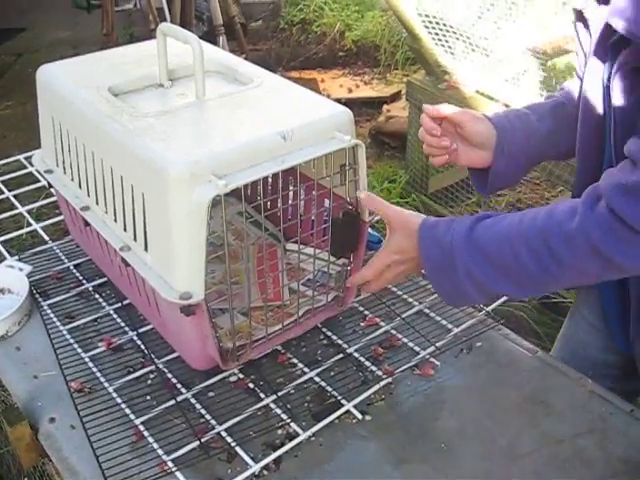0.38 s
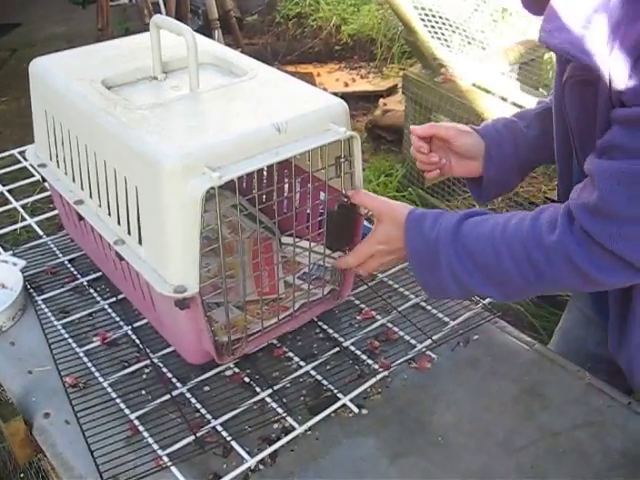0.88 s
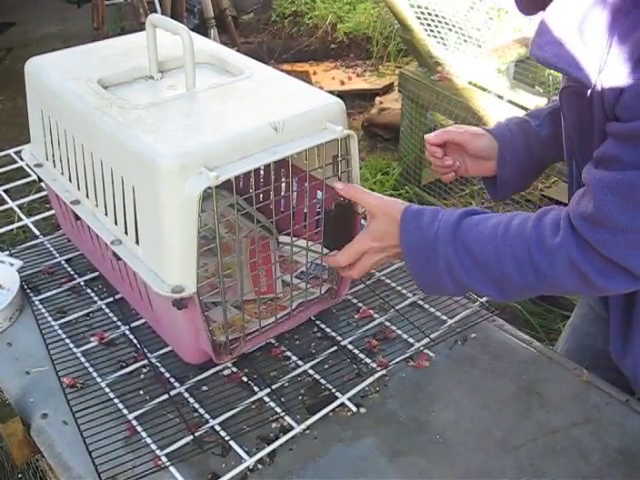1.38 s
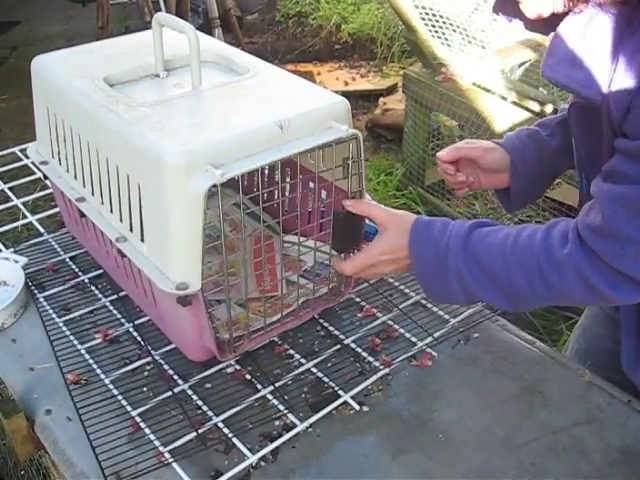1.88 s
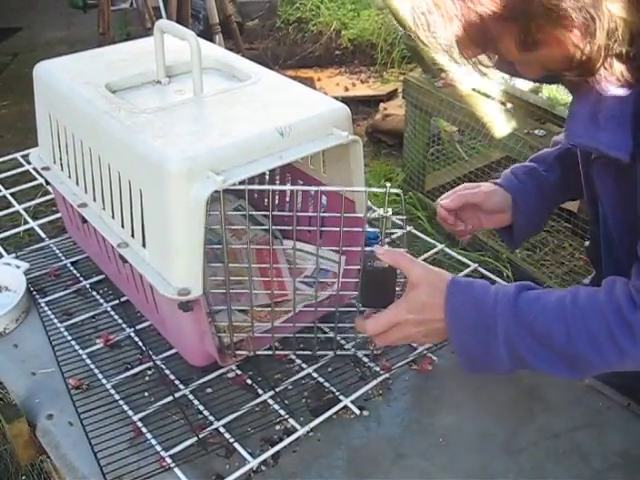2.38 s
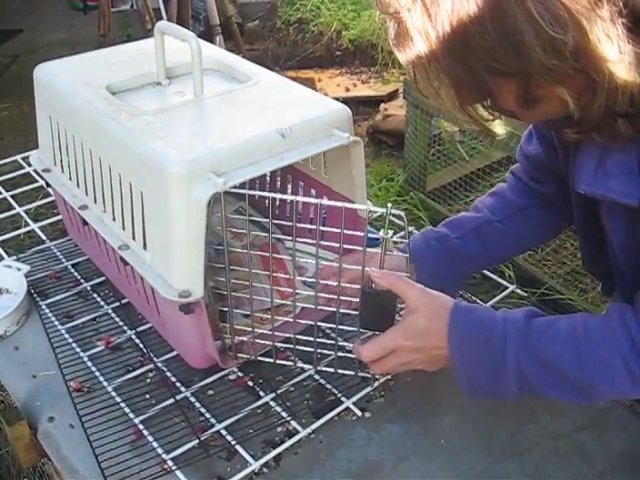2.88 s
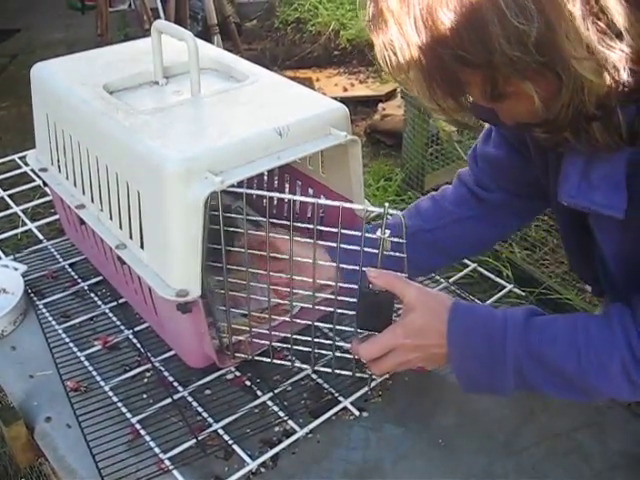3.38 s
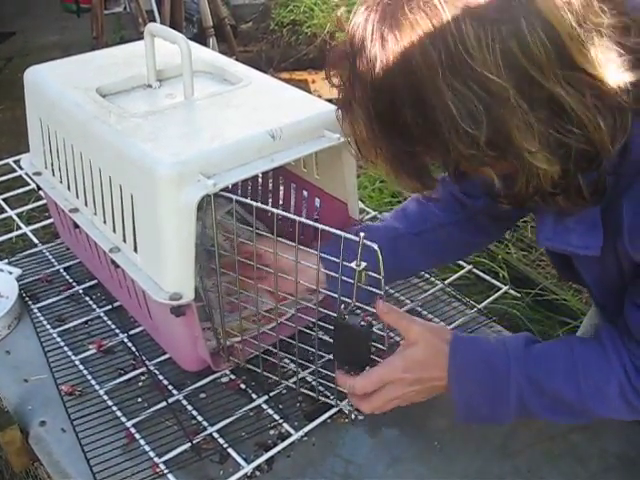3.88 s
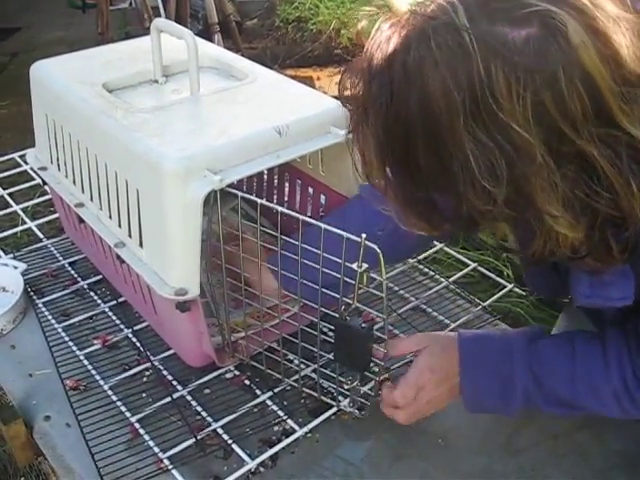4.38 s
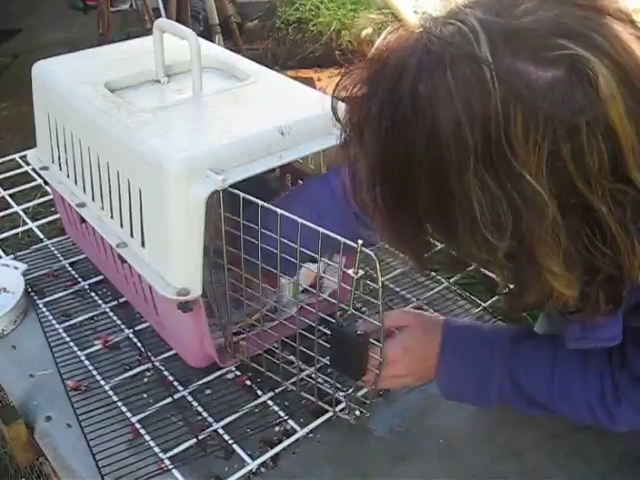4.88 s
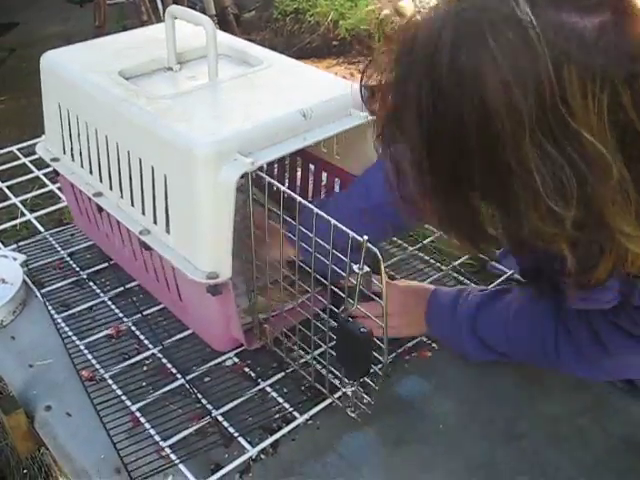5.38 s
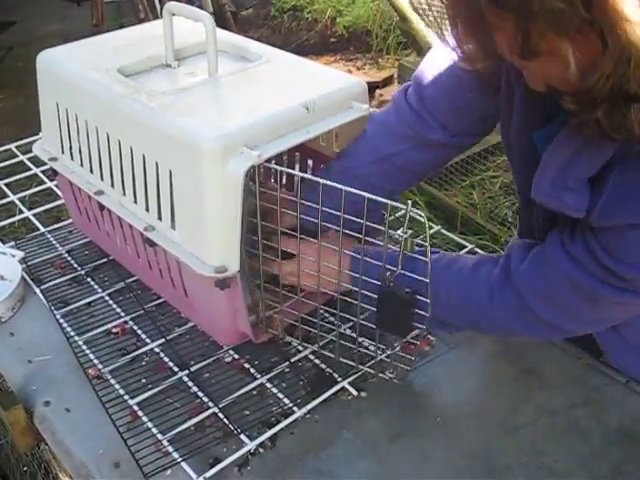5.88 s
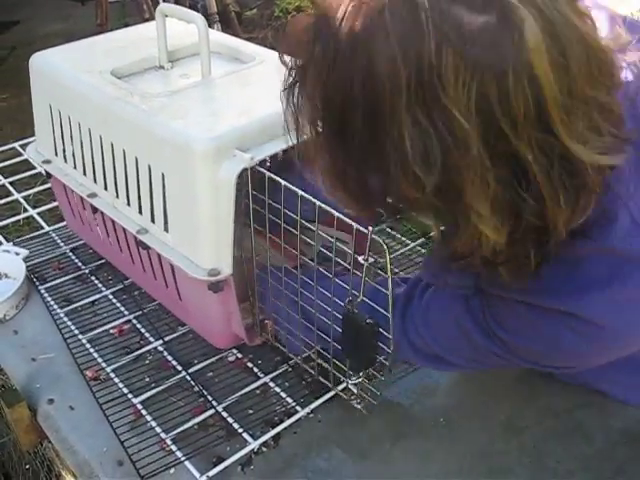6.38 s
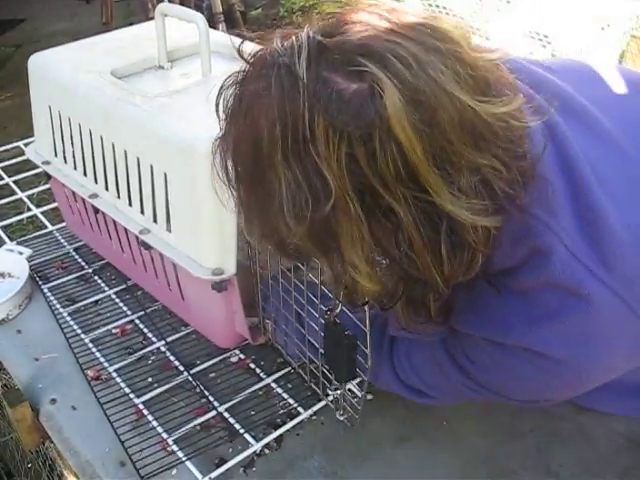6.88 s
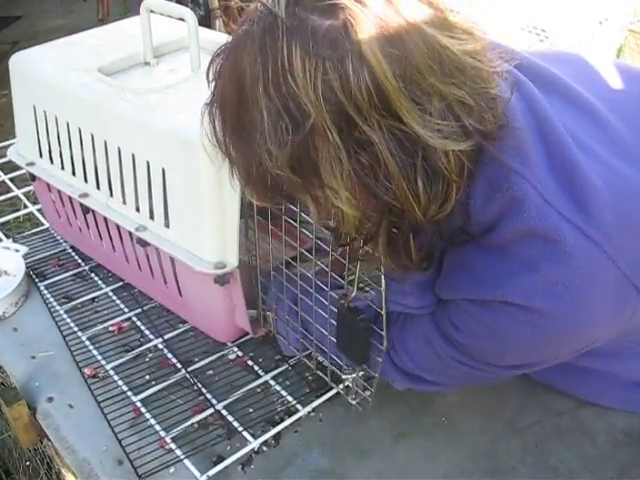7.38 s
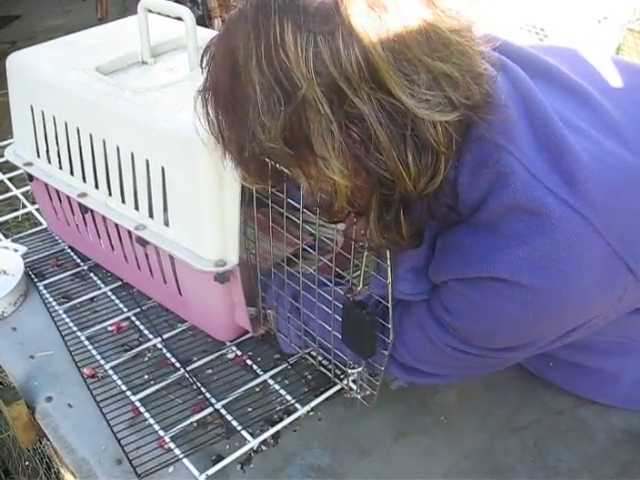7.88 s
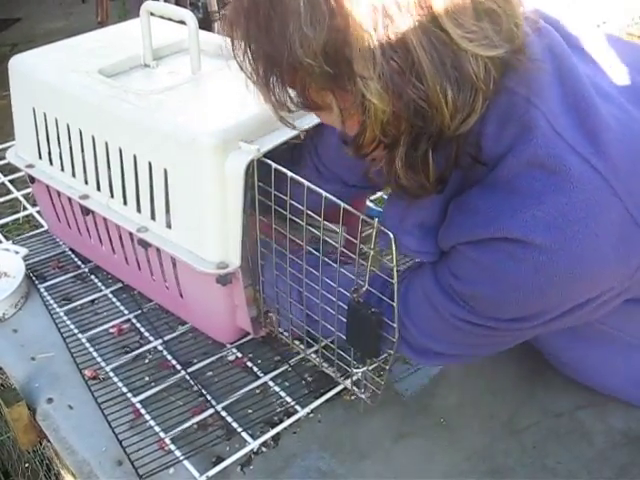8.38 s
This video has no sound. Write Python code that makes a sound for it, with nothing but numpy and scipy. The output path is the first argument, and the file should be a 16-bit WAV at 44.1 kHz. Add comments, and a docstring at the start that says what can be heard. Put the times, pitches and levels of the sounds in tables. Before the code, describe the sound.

Close, lo-fi outdoor handling noise: soft bumps on a hollow plastic box, a metallic latch clack, thin squeaks and a rattling wire grille. Paper bedding rustles almost without pause as hands rummage inside, building to a busy cluster of clatter and knocks, then calming to lighter rubbing, chirpy squeaks, low wind puffs and a tiny animal whine. Sparse bird chirps early, very short yard echo.

```python
"""Garden hiss, a faint squeak and bird notes come first, over a quiet bed of paper and plastic.
A hand then unlatches the wire door of a plastic pet carrier on a table and reaches into the paper bedding.
Friction noise, impulses and short bursts ring the door, the air in the box and the plastic shell.
Gliding sines chirp, trill and squeak, low puffs of wind push the microphone, a wavering voice whines.
A small camera samples it all at a low rate."""
import sys
import numpy as np
from scipy import signal
from scipy.fft import rfft, irfft, next_fast_len
from scipy.io import wavfile
from scipy.ndimage import map_coordinates

SR = 44100
rng = np.random.default_rng(int(sys.argv[2]) if len(sys.argv) > 2 else 0)


def store_pcm(level_fs):
    """Save levels as 16-bit WAV."""
    pcm = np.round(np.clip(level_fs, -1, 1) * 32767).astype(np.int16)
    wavfile.write(sys.argv[1], SR, np.atleast_2d(pcm).T)


def gain_from_db(level_db):
    """Turn a decibel level (scalar or array-like) into a linear amplitude factor."""
    decades = np.asarray(level_db, float) / 20
    return 10 ** decades


N = 374850  # length in samples, 8.5 s


def unit(x):
    """Scales a signal to rms 1."""
    return x / np.sqrt(np.mean(x ** 2) + 1e-20)


def along(points, hz):
    """Reads a curve of (f/Hz, value) points on a log frequency axis."""
    f, value = np.transpose(points)
    return np.interp(np.log(hz + 1), np.log(f + 1), value)


def curves(rows):
    """Draws one value per sample for each column after the time."""
    s, *columns = np.transpose(rows)
    return [np.interp(np.arange(N) / SR, s, column) for column in columns]


def wobble(rate):
    """A smooth random curve through rate knots a second."""
    knots = rng.standard_normal(int(N * rate / SR) + 4)
    return map_coordinates(knots, [np.arange(N) * rate / SR])


def filtered(x, response):
    """Multiplies the spectrum of x by a complex response of frequency."""
    size = next_fast_len(N + SR // 2)
    hz = np.fft.rfftfreq(size, 1 / SR)
    return irfft(rfft(x, size) * response(hz), size)[..., :N]


def two_pole(x, hz):
    """Dulls x with two equal low-pass poles, as soft contact does."""
    return filtered(x, lambda f: 1 / (1 + 1j * f / hz) ** 2)


def ring(x, modes):
    """Sends x through a body's resonances, signs alternating; white noise keeps its level."""
    def body(f):
        return sum((-1) ** k * gain_from_db(db) * 1j * f * width / (hz * hz - f * f + 1j * f * width)
                   for k, (hz, width, db) in enumerate(modes))
    return filtered(x, lambda f: body(f) / np.sqrt(np.mean(np.abs(body(f)) ** 2)))


def friction(slips_per_s, spread_db, smooth):
    """Random slips of uneven but bounded size over a smooth rub, at rms 1."""
    size = np.minimum(rng.exponential(size=N), 3)
    slips = (rng.random(N) < slips_per_s / SR) * gain_from_db(spread_db * size) * rng.standard_normal(N)
    return unit(unit(slips) + smooth * rng.standard_normal(N))


def ringing_grains(per_s, low_hz, high_hz, cycles):
    """Tiny knocks of single wires and creases, each at its own pitch, at rms 1."""
    when, pitch, size = rng.random((int(per_s * N / SR), 3)).T
    hz = low_hz * (high_hz / low_hz) ** pitch[:, None]
    t = np.arange(SR // 40) / SR
    envelope = np.exp(-t * hz / cycles) * (1 - np.exp(-t / 0.00022))
    grain = gain_from_db(14 * size)[:, None] * np.sin(2 * np.pi * hz * t) * envelope
    at = (when * N).astype(int)[:, None] + np.arange(len(t))
    return unit(np.bincount(at.ravel(), grain.ravel())[:N])


def bursts(times, dbs, t60s, attack):
    """A puff of noise for each contact, quick to rise, dying at its own speed."""
    out, t = np.zeros(N + SR), np.arange(SR // 10) / SR
    for s, db, t60 in zip(times, dbs, t60s):
        shape = gain_from_db(db - 60 * t / max(t60, .004)) * (1 - np.exp(-t / attack))
        out[round(s * SR):][:len(t)] += shape * rng.standard_normal(len(t))
    return out[:N]


def strokes(rows):
    """Gains of two layers under strokes that swell and fade evenly in dB, 20 dB per rise or fade."""
    t, main, second = np.arange(N) / SR, np.zeros(N), np.zeros(N)
    for s, db, over_db, rise, fade in rows:
        away = np.where(t < s, (s - t) / abs(rise), (t - s) / abs(fade))
        power = gain_from_db(2 * (db - 20 * away))
        main = main + power
        second = second + power * gain_from_db(2 * over_db)
    return np.sqrt(main), np.sqrt(second)


def uneven(stroke, steady, pressure):
    """Strokes waver a little with the hand's pressure; the rummaging comes in stronger clumps."""
    wavering = stroke * unit(gain_from_db(1.0 * pressure))
    clumped = steady * unit(gain_from_db(1.9 * pressure))
    return np.hypot(wavering, clumped)


# spectrum shape of garden air and camera hiss: f/Hz, relative level/dB per Hz
HISS_SHAPE = [(25, -12.5), (49, -22), (163, -9), (293, -13.5), (690, -9.5), (884, -17), (2130, -21),
              (4590, -24.5), (5500, -23), (7150, -57.5)]
# low rumble from breeze and table: t/s, rms level/dB
BREEZE_LEVEL = [(0.0, -80), (0.57, -38.5), (1.02, -65), (1.2, -38.5), (1.38, -62.5), (2.09, -48),
                (3.01, -62.5), (3.34, -55), (4.99, -55.5), (5.16, -27), (5.27, -36), (5.43, -48),
                (5.75, -52), (6.17, -41.5), (6.62, -65), (6.79, -46.5), (7.54, -58.5), (8.5, -61)]


def garden():
    """Far noise hiss that drifts a little, and low-passed lumps of breeze."""
    hiss = unit(filtered(rng.standard_normal(N), lambda hz: gain_from_db(along(HISS_SHAPE, hz))))
    rumble_shape = [(12, -15.0), (25, -14.5), (60, -7.0), (105, -0.5), (160, -6.0), (300, -47.0)]  # f/Hz, dB
    lumps = gain_from_db(2.5 * wobble(15)) * rng.standard_normal(N)
    breeze = unit(filtered(lumps, lambda hz: gain_from_db(along(rumble_shape, hz))))
    return gain_from_db(-46 + 1.3 * wobble(5.7)) * hiss + gain_from_db(curves(BREEZE_LEVEL)[0]) * breeze


# short squeaks and trills of wire, bird and animal:
# start t/s, end t/s, start f/Hz, end f/Hz, level/dB, scale of the pitch smear/%
SQUEAKS = [(0, .1, 1720, 1740, -55.5, 1.5), (1.353, 1.486, 2870, 2950, -49, 1.7),
           (1.496, 1.622, 2900, 3000, -55, 3.3), (1.637, 1.672, 4170, 4240, -31, 1.5),
           (1.643, 1.678, 3370, 3380, -35, 1.6), (1.749, 1.852, 2450, 2500, -43, 3),
           (1.81, 1.867, 3920, 3830, -46.5, 1.2), (1.757, 1.797, 4750, 4800, -50, 1.5),
           (1.792, 1.85, 1594, 1550, -48.5, 2.6), (1.958, 2.044, 2850, 2950, -50, 3.2),
           (2.07, 2.117, 3090, 2850, -29, 3.3), (2.065, 2.125, 2015, 2500, -31, 2.3),
           (2.08, 2.109, 4250, 4200, -31, 2.6), (6.888, 6.924, 2157, 2220, -27.5, 3.5),
           (2.38, 2.428, 2520, 2470, -40.5, 0.9), (7.393, 7.45, 4000, 4400, -32, 0.56),
           (7.438, 7.514, 4410, 4090, -36.5, 0.88), (7.45, 7.5, 2360, 2590, -42, .8),
           (7.885, 7.943, 2800, 2980, -45.5, 1.2)]


def squeaks():
    """A gliding squeak: a sine whose pitch is smeared and whose level flickers at random."""
    out, flicker, rasp = np.zeros(N), gain_from_db(3.9 * wobble(90)), gain_from_db(3 * wobble(400))
    waver = wobble(120) / 2 + 1.3 * wobble(700)
    for start, end, start_hz, end_hz, db, smear in SQUEAKS:
        at = np.arange(round(start * SR), round(end * SR))
        hz = np.linspace(start_hz, end_hz, len(at)) * (1 + smear / 100 * waver[at])
        tone = np.sin(2 * np.pi * np.cumsum(hz) / SR)
        envelope = unit(flicker[at] * rasp[at]) * signal.windows.tukey(len(at), .3)
        out[at] += np.sqrt(2) * gain_from_db(db) * envelope * tone
    return out


# resonances of the door's frame, also rung by the clicks: f/Hz, width f/Hz, level/dB
FRAME_MODES = [(1283, 670, -4.5), (1414, 130, 0), (1630, 160, -5), (2119, 203, 5), (2450, 400, -2.5)]
# resonances of the door's wires, also rung by the clicks: f/Hz, width f/Hz, level/dB
WIRE_MODES = [(2950, 940, -4.5), (3670, 170, 2.5), (3985, 470, -0.5), (4830, 880, -2), (5390, 510, -1)]
# the hand rummaging without a break, also in the shaking: t/s, paper level/dB, box level/dB
RUMMAGING = [(0, -68, -66), (1.3, -60.5, -53), (2.03, -60, -52), (2.25, -44.5, -39), (2.5, -53.5, -46.5),
             (2.78, -63, -45), (3.17, -57.5, -46.5), (3.4, -54.5, -42), (3.9, -57.5, -47),
             (4.3, -51.5, -42), (4.64, -58, -53), (4.83, -43.5, -34.5), (5.17, -52, -35.5),
             (5.45, -45, -42), (5.9, -43, -34.5), (6.6, -41.5, -36.5), (7.2, -45, -38.5),
             (7.8, -46.5, -44.5), (8.03, -56.5, -45.5), (8.5, -56.5, -45.5)]
# paper and sleeve along the door: peak t/s, frame level/dB, wires level/dB over the frame,
# rise t/s and fade t/s over 20 dB
DOOR_RUBS = [(1.182, -35.5, -31.5, 0.025, 0.13), (1.651, -46, 16, 0.014, 0.078),
             (1.701, -32.5, 0.5, 0.049, 0.047), (1.83, -44, -2.5, 0.3, .08),
             (2.06, -43.5, -2, 0.013, 0.092), (2.105, -27.5, -1.5, 0.034, 0.06),
             (2.544, -35.5, 2, 0.031, 0.11), (2.604, -36, 1.5, 0.076, 0.019), (3.213, -32, -8, .01, .1),
             (3.238, -25, -8, 0.033, 0.062), (3.277, -30.5, -6, 0.11, 0.011),
             (3.335, -37, -4.5, 0.04, 0.031), (3.424, -34.5, -1.5, 0.0095, 0.043),
             (3.555, -33.5, -3.5, 0.026, 0.037), (3.64, -39.5, -3, 0.072, 0.046),
             (3.776, -41, 0.5, 0.11, 0.066), (4.136, -34, 0.5, 0.018, 0.098),
             (4.232, -35.5, -3, 0.043, 0.03), (4.38, -41.5, -14, 0.017, 0.053),
             (4.739, -28.5, -5.5, 0.0063, 0.12), (4.862, -32, 1.2, 0.026, 0.055),
             (4.95, -37, -4.5, 0.076, 0.031), (5.06, -29, -4, 0.099, 0.085),
             (5.253, -37.5, 1.5, 0.038, 0.079), (5.89, -31.5, 1, 0.047, 0.054),
             (6.004, -28.5, 0, 0.021, 0.032), (6.125, -32, -0.5, 0.064, 0.055),
             (6.19, -24.5, -2, 0.04, 0.12), (6.36, -26, -7, 0.041, 0.053), (6.899, -33.5, 0, 0.025, 0.17),
             (7.02, -45.5, 5, 0.043, 0.058), (7.25, -37, -2.5, 0.052, 0.11),
             (7.917, -39.5, -5.5, 0.2, 0.082), (8.226, -37, 2.5, 0.13, 0.14),
             (8.471, -38, 3.5, 0.067, 0.052)]


def handling(pressure):
    """Rubbing excites the door's frame and wires; loose parts ring at scattered pitches."""
    on_frame, on_wires = strokes(DOOR_RUBS)
    steady = gain_from_db(curves(RUMMAGING)[0])
    scrape = friction(3000, spread_db=6.0, smooth=0.58)
    frame = ring(scrape, FRAME_MODES) + gain_from_db(-5) * ringing_grains(150, 998.0, 2700, cycles=7.8)
    wires = ring(scrape, WIRE_MODES) + gain_from_db(-5.5) * ringing_grains(200, 2700, 5300, cycles=21.0)
    frame_gain = uneven(on_frame, steady, pressure)
    wires_gain = uneven(on_wires, gain_from_db(0.14) * steady, pressure)
    return frame_gain * frame + wires_gain * wires


# resonances of the air in the box, also rung by the knocks: f/Hz, width f/Hz, level/dB
BOX_MODES = [(533.5, 71, 3), (631.4, 32.7, 6.5), (748.4, 102, 7.5), (886, 125, 3), (1230, 273, -8.5)]
# resonances of the plastic shell, also rung by the knocks: f/Hz, width f/Hz, level/dB
SHELL_MODES = [(141.4, 40, -4), (192, 22, 3), (243.3, 37, 1), (307.5, 37.3, 5.5), (385, 180, -12.5)]
# pushes on the carrier: peak t/s, box level/dB, shell level/dB over the box,
# rise t/s and fade t/s over 20 dB
CARRIER_SHOVES = [(.5, -52.5, 11.5, 0.03, 0.1), (.57, -19.5, 8, 0.015, 0.038), (.64, -37, 5.5, 0.11, 0.14),
                  (.798, -29.5, 6, 0.061, 0.05), (.89, -43.5, 14.5, 0.21, 0.16),
                  (1.186, -24, -3.5, 0.03, 0.1), (1.487, -49.5, 20, 0.17, 0.13),
                  (1.706, -23, -4.5, 0.031, 0.042), (1.841, -30.5, 0.5, 0.039, 0.077),
                  (2.175, -32, -7.5, 0.11, 0.067), (2.595, -35, -4, 0.16, 0.044),
                  (2.872, -31, -5.5, .015, 0.096), (3.24, -28.5, -22, 0.049, 0.096),
                  (3.722, -34.5, -7.5, 0.018, 0.13), (4.95, -27.5, -6.5, 0.052, 0.057),
                  (5.03, -28, 4, 0.02, 0.087), (5.265, -28, -1.5, 0.025, 0.084),
                  (5.585, -36, 3.5, 0.081, 0.04), (5.768, -26.5, -12, 0.07, 0.045),
                  (6.19, -23, -5.5, 0.13, 0.2), (6.81, -39, 9.5, 0.025, 0.1), (7.055, -34, 7, 0.084, 0.08),
                  (7.912, -39, -3, 0.11, 0.13), (8.226, -35.5, -3, 0.15, 0.16), (8.496, -31, 3, 0.06, .1)]


def shaking(pressure):
    """Soft pushes of hands and animal: dull, so mostly the low resonances answer."""
    on_box, on_shell = strokes(CARRIER_SHOVES)
    steady = gain_from_db(curves(RUMMAGING)[1])
    box = uneven(on_box, steady, pressure) * friction(600, spread_db=1.5, smooth=0.44)
    shell_gain = uneven(on_shell, gain_from_db(-6.5) * steady, pressure)
    shell = shell_gain * friction(250, spread_db=2.0, smooth=1.28)

    def moved(share):
        return [(hz * (1 + share), width, db) for hz, width, db in BOX_MODES]

    # arm and animal in the box move its resonances: a random blend of 7 % lower and 3.5 % higher
    fill = np.pi / 4 * (1 + np.tanh(wobble(8)))
    boxed = ring(box * np.sin(fill), moved(-.07)) + ring(box * np.cos(fill), moved(.035))
    return two_pole(boxed, 2700) + two_pole(ring(shell, SHELL_MODES), 970)


# bird notes, each a list of points: t/s, f/Hz, level/dB
BIRD_NOTES = [
    [(.14, 2950, -55), (.158, 2955, -51), (.18, 2300, -51)],
    [(.26, 3057, -56), (.305, 3180, -52)],
    [(.33, 2980, -53), (.39, 2410, -58)],
    [(.97, 2780, -49), (.984, 3170, -50), (1.013, 2270, -44)],
    [(1.07, 2330, -56), (1.104, 3150, -49), (1.14, 3160, -47), (1.18, 2770, -51), (1.23, 2400, -62)],
    [(2.94, 2560, -48), (2.98, 2330, -45), (3.03, 2360, -53)],
    [(3.04, 2600, -54), (3.1, 2640, -54)],
]


def birds():
    """Gliding sine notes, a little hoarse from wavering pitch and level, with soft ends."""
    out, waver, flutter_db = np.zeros(N), .009 * wobble(300), 2.5 * wobble(120)
    for note in BIRD_NOTES:
        s, hz, db = np.transpose(note)
        at = np.arange(round(s[0] * SR), round(s[-1] * SR))
        glide = np.interp(at / SR, s, hz) * (1 + waver[at])
        phase = 2 * np.pi * np.cumsum(glide) / SR
        level = gain_from_db(np.interp(at / SR, s, db) + flutter_db[at])
        out[at] += np.sqrt(2) * level * signal.windows.tukey(len(at), .3) * np.sin(phase)
    return out


# sharp contacts of wire, claws and paper: t/s, reference level/dB, f/Hz, wires level/dB over the reference
CONTACTS = [(0.2542, -32, 3210, -15.5), (0.319, -26, 925, -24), (0.954, -42.5, 3670, -0.5),
            (1.185, -10, 1423, -33), (1.265, -18, 2680, -5.5), (1.3155, -22, 3500, -4),
            (1.7, -13.5, 2425, -7.5), (2.0559, -20.5, 2910, -14), (2.0989, -13.5, 2100, -8),
            (2.144, -14, 2185, -11), (2.1672, -11, 1627, -9.5), (2.2664, -21.5, 1870, -6.5),
            (2.369, -22, 2580, -12), (2.431, -23, 1910, -10.5), (2.5812, -26.5, 2480, -2.5),
            (2.6814, -28, 1320, -9), (2.795, -21, 3390, -16.5), (2.864, -27.5, 1000, -27),
            (3.236, -10, 2090, -20), (3.302, -24, 2750, -3.5), (3.4229, -17, 1300, -7.5),
            (3.548, -21.5, 2060, -14.5), (3.6278, -30, 2340, -3), (3.717, -13.5, 1066, -21.5),
            (3.7682, -29.5, 2500, 4.5), (4.1291, -11.5, 2540, -16), (4.2057, -15, 2330, -12.5),
            (4.286, -24, 1950, -12), (4.4999, -28.5, 1560, -14.5), (4.7312, -10, 2420, -25.5),
            (4.8549, -11, 2480, -21), (4.9315, -19, 2030, -8), (4.9619, -4, 2190, -23),
            (5.0501, -11, 2050, -11.5), (5.349, -16.5, 1495, -30.5), (5.5739, -12, 2060, -8),
            (5.599, -13.5, 1500, -16.5), (5.769, -11.5, 2310, -5), (5.912, -15, 2520, -17.5),
            (5.9866, -15.5, 2540, -0.5), (6.2703, -19, 2790, -5), (6.354, -17.5, 2140, -11),
            (6.452, -22, 1970, -5.5), (6.557, -22, 4010, -3), (6.7339, -21.5, 4570, -2.5),
            (6.8916, -19.5, 2010, -5), (6.9349, -14, 2110, -1.5), (7.454, -24, 1975, -5.5),
            (7.612, -31.5, 2300, -2), (7.818, -30, 2330, -2), (8.215, -19.5, 2030, -3.5),
            (8.4757, -25.5, 2460, 0.5)]


def clicks():
    """Each contact cracks through the door and rings briefly at the pitch of the part it hits."""
    s, db, hz, wires_db = np.transpose(CONTACTS)
    # a harder contact is a shorter one: 18 ms at 0 dB, doubling for each 16 dB down
    t60 = 0.018 * 2 ** (-db / 16)
    tones, t = np.zeros(N + SR), np.arange(SR // 10) / SR
    for start, level, pitch, life in zip(s, db, hz, t60):
        decay = gain_from_db(level - 3 - 60 * t / (0.41 * life))
        tone = decay * np.sin(2 * np.pi * pitch * t) * (1 - np.exp(-t / 0.0001))
        tones[round(start * SR):][:len(t)] += tone
    # a bright contact leaves less for the frame
    frame_db = db - 8 + 10 * np.log10(np.clip(1 - gain_from_db(2 * wires_db) / 2, .03, 1))
    frame = ring(bursts(s, frame_db, t60, attack=0.00075), FRAME_MODES)
    # the first touch is a single impulse on the wires
    snap = np.bincount(np.round(s * SR).astype(int), gain_from_db(db + wires_db + 15), N)
    crackle = bursts(s, db + wires_db, 0.7 * t60, attack=0.00064)
    return tones[:N] + frame + ring(snap + crackle, WIRE_MODES)


# blows on the plastic: t/s, box reference level/dB, shell level/dB over the box
BLOWS = [(0.321, -27.5, -19), (0.477, -38.5, 13), (0.563, -14, -10), (1.18, -16, -7), (1.834, -26.5, -13),
         (2.166, -19.5, -25), (2.252, -17.5, -9.5), (2.513, -25, -34), (2.598, -20.5, -13),
         (2.864, -25, -6), (3.236, -19, -30), (3.719, -14.5, -38), (4.142, -18.5, -10.5),
         (4.231, -22.5, -32), (4.287, -26, -28), (4.341, -25, -37), (4.381, -26, -8), (4.502, -25, -9),
         (5.001, -16.5, -21.5), (5.02, -19.5, 5), (5.05, -12.5, -21), (5.08, -19, -3.5),
         (5.122, -14.5, -9.5), (5.249, -18.5, 0.5), (5.302, -24.5, -5.5), (5.348, -21.5, -15),
         (5.457, -29.5, -8), (5.575, -18.5, -6), (5.814, -16.5, -40), (5.953, -30, -28),
         (6.004, -17.5, -6.5), (6.05, -15.5, -5), (6.117, -21, -10.5), (6.155, -19.5, 1.5),
         (6.181, -19, -13.5), (6.237, -8, -15.5), (6.361, -14.5, -27), (6.391, -24.5, -19.5),
         (6.523, -20.5, -8), (6.558, -28.5, 3.5), (6.634, -32.5, -16), (6.6907, -16, -21),
         (6.796, -17.5, 9), (7.903, -21, -1.5), (8.046, -31.5, 1.5)]


def knocks():
    """A firm push and a short chatter after it ring the air in the box and the heavier shell."""
    s, db, shell_db = np.transpose(BLOWS)
    at, t60 = np.round(s * SR).astype(int), np.full(len(s), .04)

    def push(level_db):
        return np.bincount(at, gain_from_db(level_db), N)

    box = push(db + 16.0) + bursts(s, db - 5.5, t60, attack=0.00013)
    shell = push(db + shell_db + 17.5) + bursts(s, db + shell_db, t60, attack=0.00041)
    return two_pole(ring(box, BOX_MODES) + ring(shell, SHELL_MODES), 2500)


# wind on the microphone: t/s, level/dB
WIND_PUFFS = [(4.145, -41.5), (7.2, -42), (7.31, -39.5), (7.66, -39), (7.77, -37), (7.86, -37), (7.94, -39)]


def puffs():
    """Each puff pushes the membrane in and lets it swing back once, a single 40 Hz cycle."""
    puff_hz = 40
    out, turn = np.zeros(N + SR), np.arange(round(SR / puff_hz)) * puff_hz / SR
    for s, db in WIND_PUFFS:
        out[round(s * SR):][:len(turn)] += gain_from_db(db) * np.sin(2 * np.pi * turn) * np.sin(np.pi * turn)
    return out[:N]


# the animal's voice: t/s, f/Hz, level/dB, octave level/dB over the pitch
ANIMAL_WHINE = [(7.765, 520, -41, -11), (7.785, 545, -37, -11), (7.85, 560, -36, -8), (7.89, 600, -44, 6),
                (7.955, 430, -43, 6)]


def guinea_pig():
    """A short hoarse whine: a wavering pitch whose octave takes over at the end."""
    hz, db, octave_db = curves(ANIMAL_WHINE)
    t = np.arange(N) / SR
    phase = 2 * np.pi * np.cumsum(hz * (1 + .04 * wobble(200))) / SR
    harmonics_db = [0, octave_db, -12, -11]
    voice = sum(gain_from_db(level + 3.5 * wobble(90)) * np.sin(k * phase)
                for k, level in enumerate(harmonics_db, 1))
    return gain_from_db(db) * voice * (t > ANIMAL_WHINE[0][0]) * (t < ANIMAL_WHINE[-1][0])


def yard(x):
    """Table, fence and walls send back a short tail: noise falling 60 dB in 0.2 s."""
    t = np.arange(SR // 4) / SR
    tail = rng.standard_normal(len(t)) * gain_from_db(-60 * t / 0.2) * (t > .003)
    return signal.fftconvolve(x, tail / np.linalg.norm(tail))[:N]


def scene():
    """Carrier, animal, birds and garden, with the yard's answer."""
    pressure = 0.56 * wobble(9) + wobble(25) + wobble(70)  # of the hand, shared by door and carrier
    carrier = handling(pressure) + shaking(pressure) + clicks() + knocks() + squeaks() + guinea_pig()
    song = birds()
    echo = gain_from_db(-13.0) * yard(carrier + 1.2 * song)
    return (carrier + song + echo + garden() + puffs())[None]


def roll_off(x):
    """The treble ends steeply here."""
    return signal.sosfilt(signal.butter(12, 7090, fs=SR, output="sos"), x)


# playback filter of the camera: f/Hz, level/dB
PLAYBACK_FILTER = [(3000, 1), (5000, -2.5), (6000, -13), (6600, -27.5), (7000, -43), (7300, -53),
                   (8000, -90)]


def record(dry):
    """Peaks saturate softly; quarter-rate sampling mirrors the treble around 5.5 kHz, partly let through."""
    keep_every = 4  # samples
    pressed = .6 * np.tanh(dry / .6)
    narrow = filtered(pressed, lambda hz: hz < SR / keep_every / 2)
    sampled = keep_every * narrow * (np.arange(N) % keep_every == 0)
    played = filtered(sampled, lambda hz: gain_from_db(along(PLAYBACK_FILTER, hz))) - .0047  # constant offset
    return roll_off(played)


dry = scene()
out = record(dry)
store_pcm(out)
```